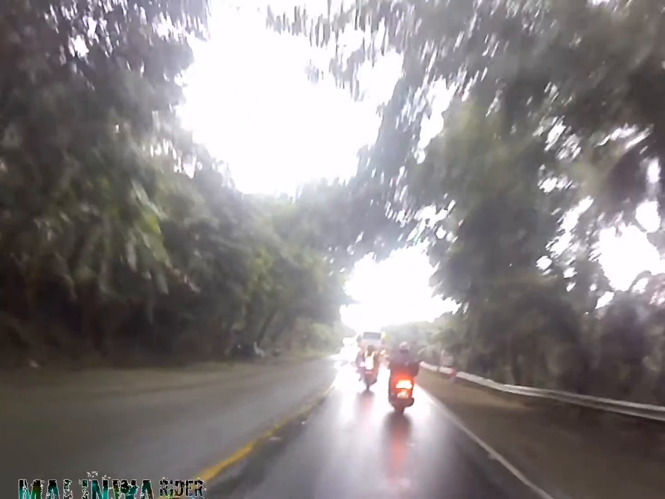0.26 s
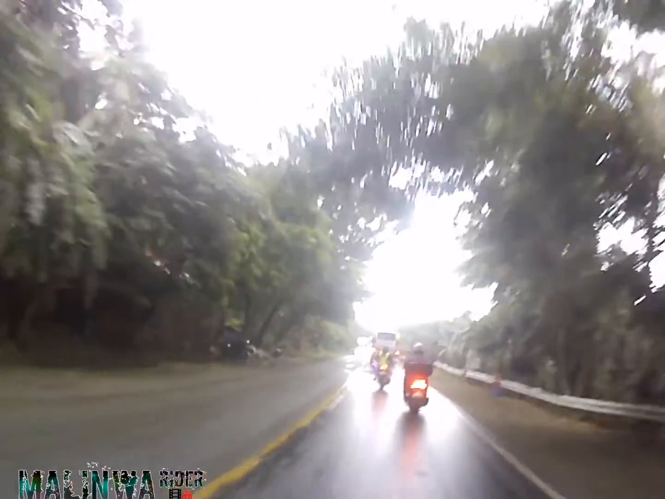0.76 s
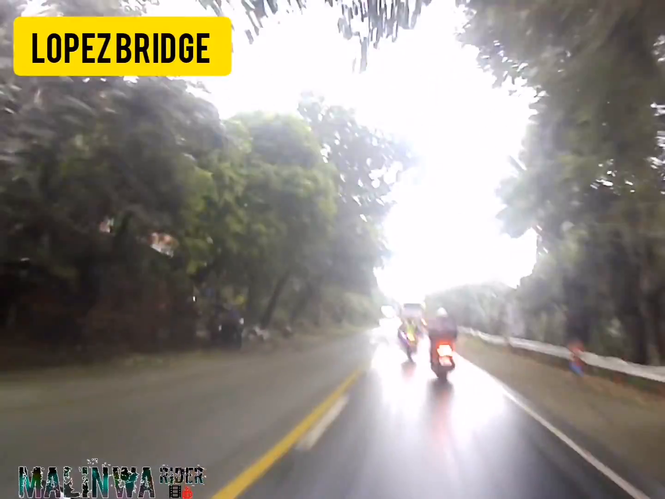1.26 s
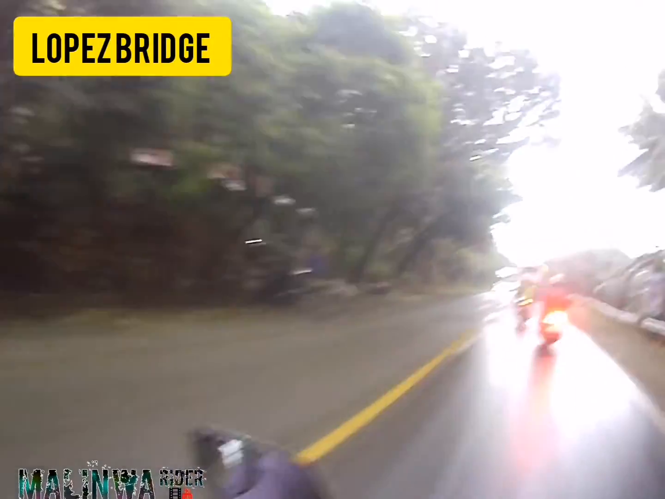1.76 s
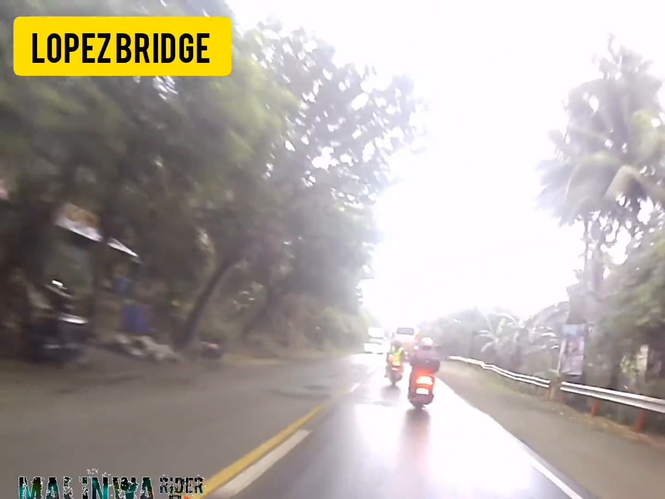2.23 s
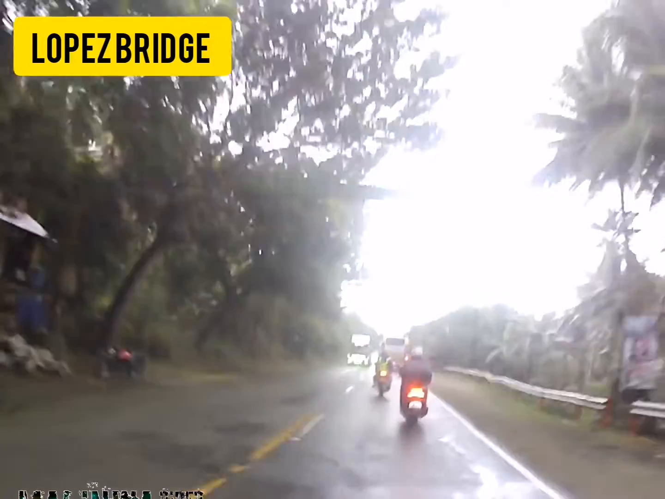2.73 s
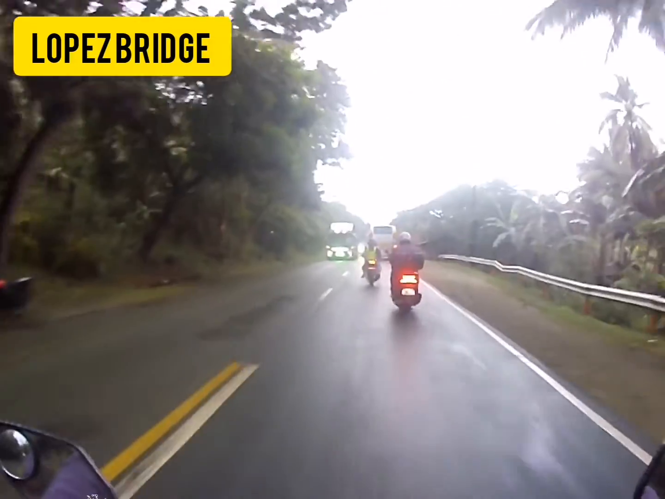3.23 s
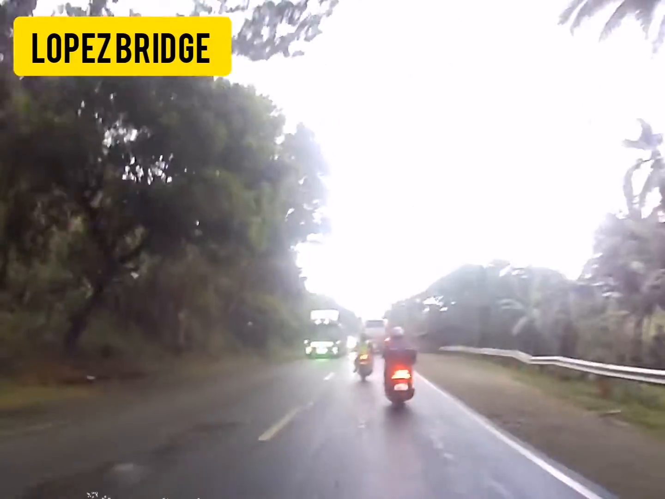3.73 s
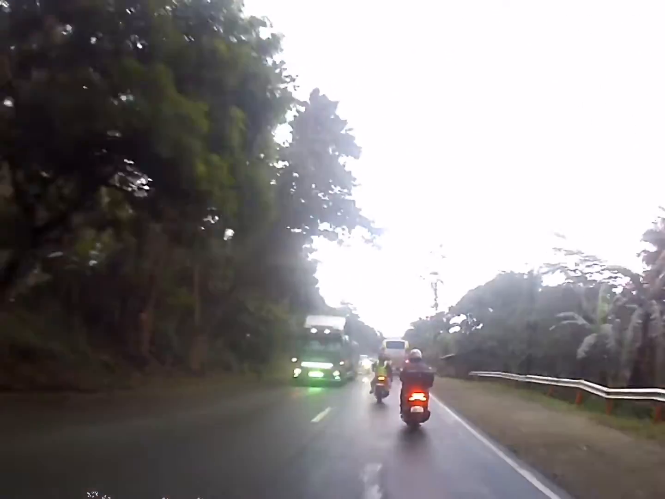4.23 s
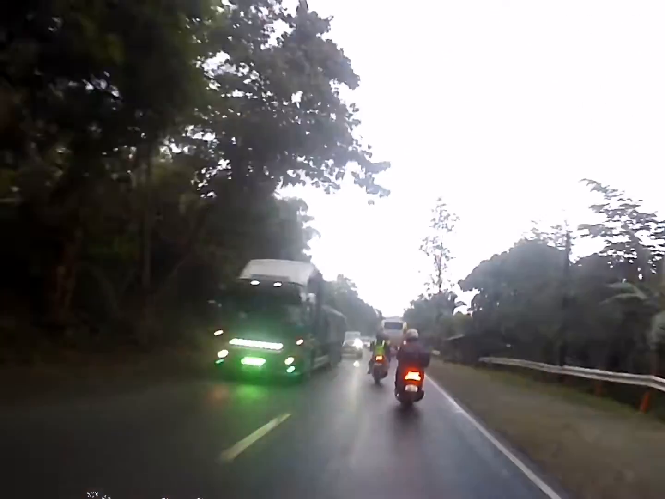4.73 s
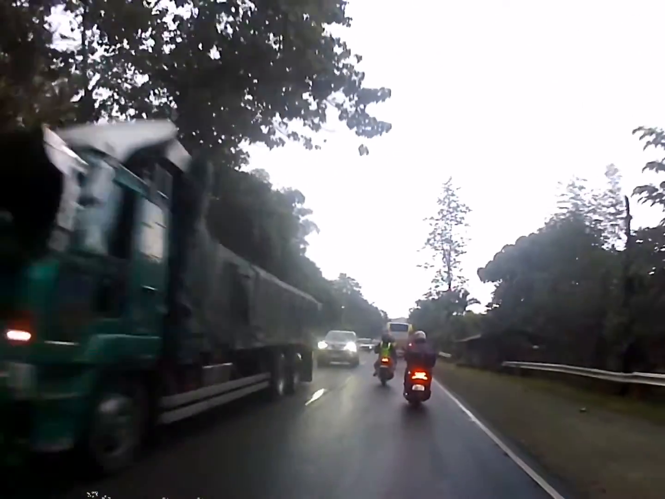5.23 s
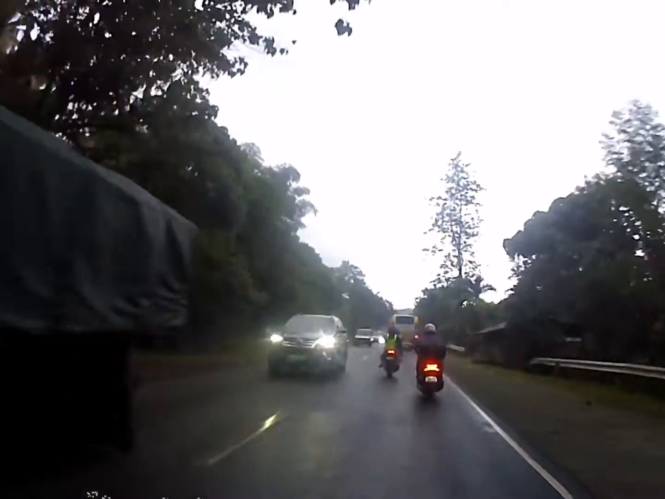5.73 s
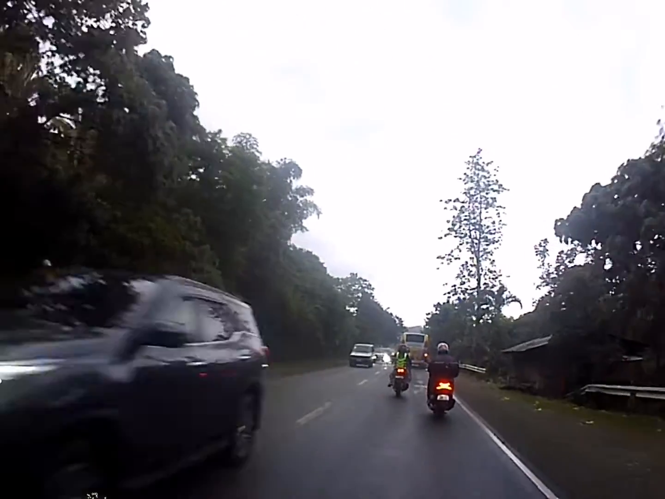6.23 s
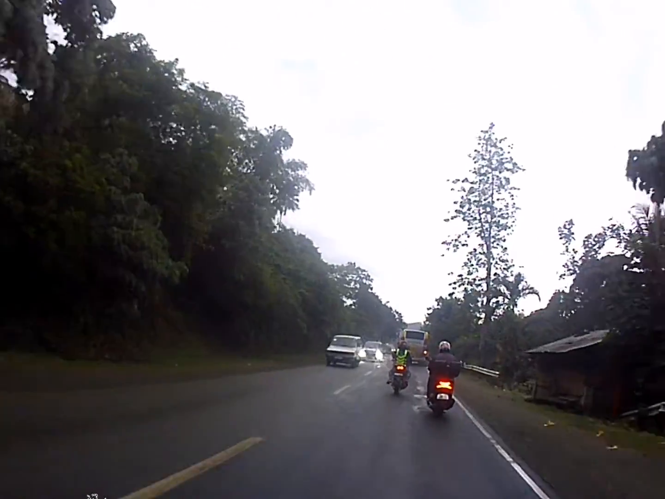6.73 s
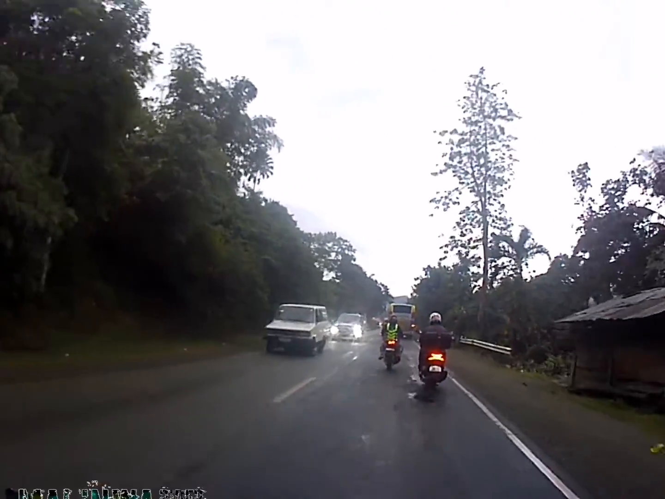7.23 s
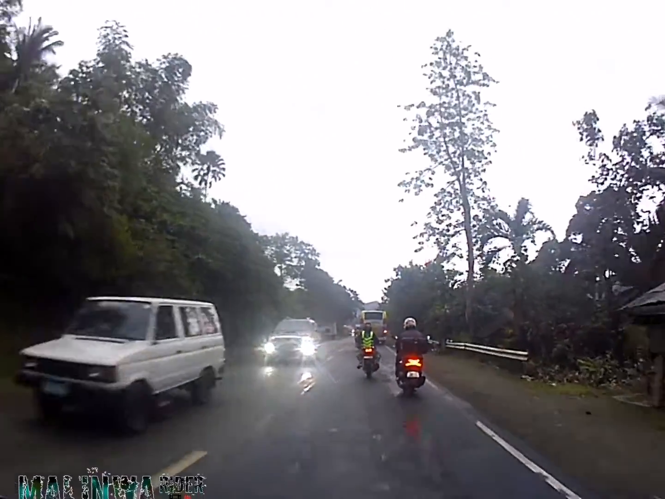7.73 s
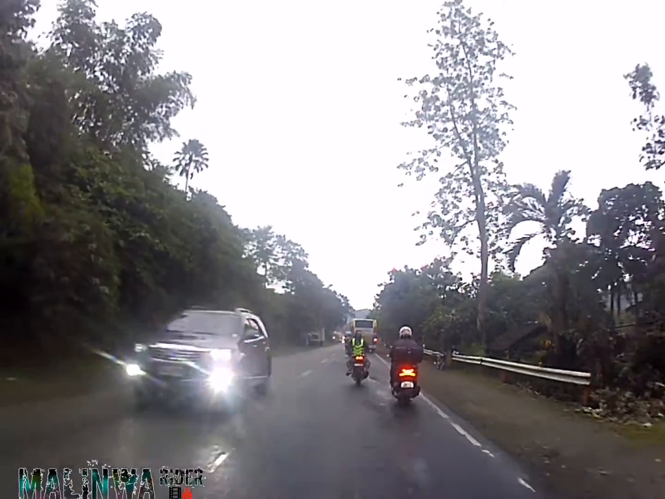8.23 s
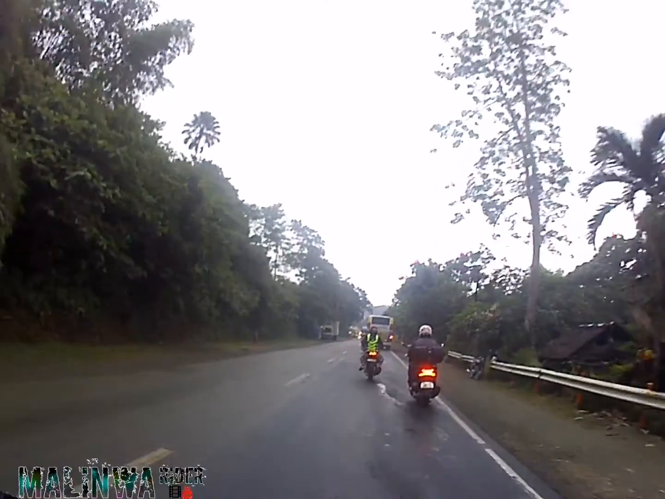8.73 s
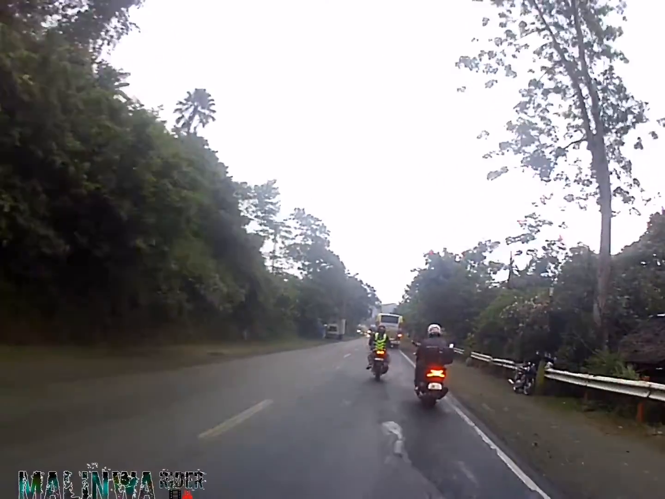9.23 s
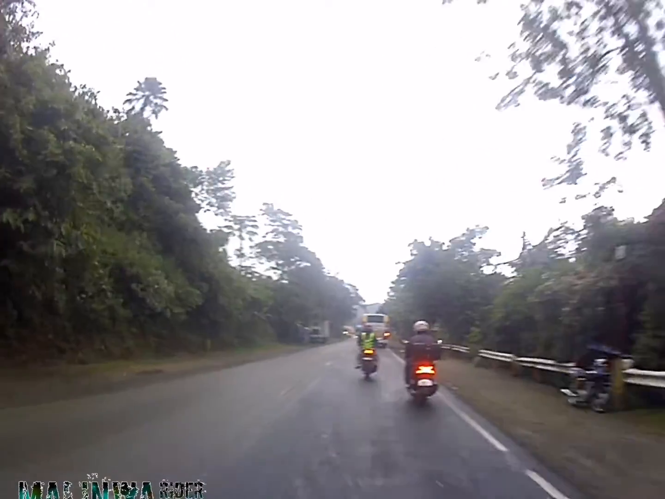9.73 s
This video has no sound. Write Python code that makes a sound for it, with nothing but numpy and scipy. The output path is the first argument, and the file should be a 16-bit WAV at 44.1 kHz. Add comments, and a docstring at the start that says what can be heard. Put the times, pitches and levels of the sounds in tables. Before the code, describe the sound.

A single-cylinder motorcycle cruises along a wet road for about ten seconds, heard from a cased microphone on the rider. The engine holds a low, slightly wavering thrum and drone, a little raspier in the first three seconds. Wind rumbles and rushes throughout, with irregular deep thumps and brief faint whistles between one and four seconds. Underneath, the tyres hiss softly and sizzle lightly through puddles. Fine spray builds from about four seconds, and an oncoming lorry passes between five and six with tyre roar, wake rumble and a wet swish, dropping slightly in pitch. A quieter car follows at 6.5 seconds, then a strong gust thuds near seven. Two more cars pass at about 8.1 and 8.7 seconds, the first with a brief falling whine, their slipstream rumbling over the microphone. Engine and wind continue to the end.

```python
"""A single-cylinder motorcycle cruises on a wet road, heard from a cased camera on the rider.
The exhaust thrums at multiples of the firing rate. Wind buffets the case and rushes through its
resonances. The tyres hiss as they peel water off the road and sizzle in puddles.
A lorry and three cars pass the other way with tyre roar, wake rumble and spray."""
import sys
import numpy as np
from scipy.fft import rfft, irfft, next_fast_len
from scipy.io import wavfile
from scipy.ndimage import map_coordinates

SR = 44100
rng = np.random.default_rng(int(sys.argv[2]) if len(sys.argv) > 2 else 0)


def bounce(signal):
    """Save signal as a 16-bit WAV file at the path given by the first command-line argument."""
    frames = np.transpose(np.atleast_2d(signal))
    limited = np.clip(frames, -1, 1)
    pcm = np.round(limited * 32767).astype(np.int16)
    wavfile.write(sys.argv[1], SR, pcm)


N = 439677
TIME_S = np.arange(N) / SR

# engine speed: time_s, firing_hz
FIRING_RATE = [(0, 28.3), (.7, 28.25), (1.5, 27.75), (3.2, 29.1), (3.9, 28.7), (5.7, 28.25), (6.6, 29.2),
               (8, 28.9), (8.8, 29.1), (10, 28.7)]
# throttle, as the booming order's level: time_s, relative_db
THROTTLE_LEVEL = [(0, -40.5), (.6, -42), (2, -39), (2.6, -38.5), (3.2, -39), (3.9, -43.5), (4.7, -39),
                  (6, -43), (7.6, -45), (9.97, -39)]
# weaker exhaust orders: firing_multiple, level_db
THRUM_ORDERS = [(2, -51), (3, -41), (4, -41), (5, -40.5), (6, -47.5), (7, -49), (10, -54), (11, -56),
                (12, -55.5), (15, -60)]
# exhaust rasp, pulling at low speed: firing_multiple, level_db
RASP_ORDERS = [(12, -55), (13, -52), (14, -53.5), (15, -54.5), (16, -50)]
# running gear drone: time_s, pitch_hz, level_db
GEAR_DRONE = [(0, 172.4, -42), (1, 173, -45.5), (2.6, 173.2, -40), (3.8, 177.2, -35), (4.7, 181.1, -42),
              (6.5, 183.3, -47), (9.97, 181.2, -41.5)]

# turbulence: time_s, relative_db
BUFFET_LEVEL = [(0, -30), (.85, -32), (1.5, -29), (2.1, -32.5), (3.6, -33.5), (4.2, -33), (4.9, -32.5),
                (5.5, -32), (6.2, -34), (6.6, -31), (7.1, -28), (7.55, -35), (8.2, -27), (8.7, -31.5),
                (9.4, -32.5), (9.97, -28.5)]
# turbulent rumble: freq_hz, density_db
BUFFET_SPECTRUM = [(12, -0.5), (25, -1.5), (55, -5), (100, -9.5), (160, -22), (250, -24.5), (500, -46.5),
                   (1200, -95)]
# gusts, deep thuds to higher flaps: time_s, level_db, centre_hz
GUST_EVENTS = [(.6, -23, 48), (1.3, -29.5, 90), (1.371, -27.5, 65), (1.437, -24.5, 68), (1.527, -22.5, 72),
               (1.622, -20.5, 42), (1.755, -25, 99), (1.812, -21, 50), (2.078, -28, 70), (2.785, -24.5, 90),
               (2.825, -23, 102), (4.28, -25.5, 62), (4.454, -24, 55.6), (4.572, -23, 61.5),
               (4.903, -22, 45.3), (5.162, -25.5, 61.6), (5.245, -27, 54.6), (5.702, -30, 55),
               (5.779, -29, 60), (5.991, -19.5, 40.4), (6.14, -21.5, 46), (6.327, -18, 38.6),
               (6.893, -15, 67), (7.088, -24.5, 52.3), (7.9, -23, 51.7), (8.134, -33, 72),
               (8.288, -25, 48.2), (8.365, -29, 52), (8.98, -16, 35.2), (9.127, -22.5, 40),
               (9.708, -26.5, 62), (9.887, -28, 54)]
# one gust: centre_multiple, density_db
GUST_SPECTRUM = [(.3, -4), (.7, 2), (1, 0), (1.5, -4), (2.5, -18), (4, -29.5), (20, -120)]
# air stream on the case: time_s, relative_db
AIRFLOW_LEVEL = [(0, -41.5), (.95, -42.5), (1.15, -39.5), (2.55, -41), (2.68, -41.5), (2.82, -39),
                 (3.1, -40.5), (3.6, -40), (3.8, -39.5), (4.4, -41), (6.4, -39.5), (6.8, -42), (8.5, -38),
                 (9.4, -41.5), (9.97, -40)]
# broad air rush: freq_hz, density_db
RUSH_SPECTRUM = [(50, -18), (120, 6), (200, 4.5), (270, -1), (350, 1), (490, -5.5), (640, -8), (900, -8),
                 (1130, -2.5), (1350, -3), (1650, -10), (2000, -15.5), (2450, -30.5), (3500, -39),
                 (6000, -78)]
# case resonances: centre_hz, width_hz, gain_re_rush_db
CASE_MODES = [(438, 130, -26), (1086, 50, -7), (1194, 97, -5.5), (1340, 48, -8.5), (1563, 55, -12)]
# wind whistles: time_s, pitch_hz, level_db, half_length_s, width_hz
WHISTLE_EVENTS = [(1.003, 1340, -48, 0.055, 18), (1.87, 1335, -43, 0.076, 18.6),
                  (1.19, 1300, -46, 0.15, 61), (1.75, 1156, -42.5, 0.5, 67), (2.2, 1340, -41.5, 0.23, 106),
                  (2.38, 1080, -42, 0.075, 46), (2.536, 1330, -40.5, 0.1, 13), (3, 1330, -46, .05, 60),
                  (3.81, 1240, -40.5, 0.1, 100), (3.772, 3230, -59, .05, 500), (9.227, 1142, -41, .05, 45)]

# oncoming wheels, three lorry axle groups then three cars:
# abreast_s, roar_db, wake_db, spray_db, swish_db, approach_s, retreat_s
PASSES = [(5.49, -35.5, -36.5, -61, -53, .2, 0.21), (5.73, -34, -33.5, -55.5, -50, 0.23, .18),
          (5.95, -34, -38.5, -66, -49.5, 0.25, .14), (6.48, -39.5, -49, -71, -59.5, 0.4, 0.18),
          (8.14, -34, -39.5, -71, -55, 0.29, 0.2), (8.72, -38.5, -34.5, -68, -55.5, 0.25, 0.18)]
# oncoming tyre roar: freq_hz, density_db
ROAR_SPECTRUM = [(300, -26), (600, -10), (900, -10), (1080, -2), (1300, 4.5), (1600, -5), (2000, -14),
                 (2500, -25.5), (3200, -30), (4400, -34), (5500, -45), (9000, -56.5), (14000, -85)]
# vehicle wake: freq_hz, density_db
WAKE_SPECTRUM = [(50, -14), (100, -5), (170, -8), (250, 6.5), (320, 7.5), (400, -0.5), (520, 1),
                 (620, -5.5), (1050, -5), (2000, -45), (6000, -92)]
# thrown spray: freq_hz, density_db
SPRAY_SPECTRUM = [(1500, -21), (3000, -18), (4500, -0.5), (5300, -8), (6300, -2), (7100, 4.5), (8200, -19),
                  (10400, -11), (11500, -19), (13300, -19), (14500, -17), (15700, -26)]
# close tyre swish: freq_hz, density_db
SWISH_SPECTRUM = [(1200, -20), (1900, 0), (2300, 4), (2650, 0), (3150, 5.5), (3700, -6), (4400, -5.5),
                  (5300, -22), (9000, -45)]
# squeaks and a passing car's whines: time_s, pitch_hz, level_db, half_length_s, glide_hz_per_s
SQUEAK_EVENTS = [(7.07, 5650, -66, 0.011, -2000), (7.12, 5680, -67, .01, -2000),
                 (7.228, 6380, -59, .014, -4000), (7.287, 6280, -62, .009, -2000),
                 (7.315, 6200, -70, .025, -1200), (8.085, 2000, -41, 0.035, -1000),
                 (8.23, 2000, -46, .08, -400), (8.037, 3010, -54, .03, -700),
                 (8.015, 1555, -39, 0.027, -600)]

# the bike's tyre hiss: freq_hz, density_db
HISS_SPECTRUM = [(1500, -5.5), (2500, 0), (3150, 1.5), (3650, -5), (4000, -3.5), (4400, -6.5), (5100, -13),
                 (6400, -9.5), (7200, -12.5), (8300, -19), (9600, -16), (10500, -12.5), (11300, -20),
                 (12500, -23), (15600, -25)]
# wetter and drier road: time_s, half_length_s, hiss_change_db
ROAD_PATCHES = [(2.8, .15, 0.5), (3.505, 0.12, -0.5), (7.3, 0.71, -1)]
# the lorry's mist: time_s, level_db
MIST_LEVEL = [(0, -90), (2.8, -71), (4.48, -61), (4.62, -58.5), (5.2, -55), (5.66, -52.5), (6.05, -70),
              (6.6, -100)]
# mist droplets: freq_hz, density_db
MIST_SPECTRUM = [(2000, -3), (2600, -5), (3300, 4), (3750, -1), (4500, -3), (5200, -11.5), (6200, -2.5),
                 (6900, -7.5), (8200, -15.5), (9600, -10.5), (10500, -6), (11500, -16), (13000, -27),
                 (15600, -27)]
# standing water: start_s, end_s, level_db
PUDDLE_SPANS = [(2.497, 3.05, -71), (3.68, 5.349, -68.5), (7.657, 8.6, -70)]
# tyres in standing water: freq_hz, density_db
SIZZLE_SPECTRUM = [(3000, -23), (4100, 4), (5150, -25), (5650, -3), (6650, -1), (7000, -9), (8200, -20),
                   (10400, -6), (11500, -26), (15000, -40)]
# drops on the case: time_s, level_db
DROP_HITS = [(6.521, -50), (8.675, -54)]

SPLASH_SCATTER_DB = 0.7


def exhaust(firing_phase, boom_order=8, firing_scatter_db=1.55, thrum_follow=0.77):
    """Uneven firings drive one booming order; weaker orders waver and partly follow the throttle."""
    throttle_db, = curves(THROTTLE_LEVEL)
    boom = amp(throttle_db + 1.5 + 1.95 * wobble(6))
    boom *= np.sin(boom_order * firing_phase + 0.38 * wobble(12))
    thrum, rasp = np.zeros((2, N))
    for order, db in THRUM_ORDERS:
        gain = amp(db + 2.8 * wobble(4))
        thrum += gain * np.sin(order * firing_phase + rng.uniform(0, 2 * np.pi) + 0.71 * wobble(14))
    thrum *= amp(thrum_follow * (throttle_db - throttle_db.mean()))
    for order, db in RASP_ORDERS:
        rasp += amp(db + 2.4 * wobble(3.2)) * np.sin(order * firing_phase + 0.5 * wobble(12))
    rasp *= bell(1.5, half_length_s=1.9)
    firing_gain = amp(firing_scatter_db * wobble(FIRING_RATE[0][1]))
    return firing_gain * (boom + thrum + rasp)


def running_gear():
    """The running gear drones on one wavering tone."""
    pitch_hz, level_db = curves(GEAR_DRONE)
    return amp(level_db + 2.1 * wobble(5.7)) * np.sin(phase_of(pitch_hz) + 0.48 * wobble(9))


def buffeting(eddy_lag_s=0.35, eddy_rise_db=1):
    """Eddies thump on the case, harder just after each vehicle; gusts add short bursts."""
    eddies = sum(bell(abreast_s + eddy_lag_s, half_length_s=0.16) for abreast_s, *_ in PASSES)
    level_db = curves(BUFFET_LEVEL)[0] + eddy_rise_db * eddies
    out = amp(level_db + 2.13 + 1.34 * wobble(18)) * noise(BUFFET_SPECTRUM)
    for time_s, db, centre_hz in GUST_EVENTS:
        window = bell(time_s, half_length_s=0.022)
        lumps = noise([(centre_hz * k, density_db) for k, density_db in GUST_SPECTRUM])
        out += amp(db) * unit(window * lumps) * np.sqrt(np.mean(window ** 2))
    return out


def airflow(firing_phase):
    """Turbulent air rings the hollow case; each firing shakes it a little."""
    def case_response(f):
        return 1 + sum(amp(db) * 1j * f * width_hz / (hz * hz - f * f + 1j * f * width_hz)
                       for hz, width_hz, db in CASE_MODES)

    level_db, = curves(AIRFLOW_LEVEL)
    flutter_db = 0.54 * wobble(18) + 0.43 * np.cos(firing_phase)
    rush = unit(filtered(noise(RUSH_SPECTRUM), case_response))
    return amp(level_db + 6.0 + flutter_db) * rush


def whistles():
    """The air stream briefly catches narrow resonances."""
    return sum(amp(db) * bell(time_s, half_length_s) * narrow_noise(hz, width_hz)
               for time_s, hz, db, half_length_s, width_hz in WHISTLE_EVENTS)


def traffic(doppler_ahead=1.04, doppler_behind=0.976, roar_lead_s=0.054):
    """Oncoming wheels swell and recede, their roar sinking in pitch; spray and swish carry less far."""
    out = np.zeros(N)
    for abreast_s, roar_db, wake_db, spray_db, swish_db, approach_s, retreat_s in PASSES:
        position = road_position(abreast_s, approach_s, retreat_s)
        distance = np.hypot(1, position)
        behind = 0.5 + 0.5 * position / distance
        tyres = sum(np.sqrt(share) * noise([(hz * ratio, db) for hz, db in ROAR_SPECTRUM])
                    for share, ratio in [(1 - behind, doppler_ahead), (behind, doppler_behind)])
        # tyres beam forward, so the roar peaks early
        roar_distance = np.hypot(1, road_position(abreast_s - roar_lead_s, approach_s, retreat_s))
        roar = amp(roar_db) * tyres / roar_distance ** 1.97
        wake = amp(wake_db) * noise(WAKE_SPECTRUM) / distance ** 2.02
        spray = amp(spray_db + SPLASH_SCATTER_DB * wobble(55))
        spray *= spatter(SPRAY_SPECTRUM, drops_per_s=900, drop_db=-2)
        spray /= distance ** np.where(TIME_S < abreast_s, 1.8, 3.5)
        swish = amp(swish_db) * noise(SWISH_SPECTRUM) / distance ** 2.5
        out += (roar + wake + spray + swish) * amp(0.78 * wobble(22))
    return out


def slipstream(time_s=8.41, level_db=-34):
    """The second car's slipstream rumbles over the case."""
    return amp(level_db) * bell(time_s, half_length_s=0.082) * noise(WAKE_SPECTRUM)


def squeaks():
    """Brief rough tones sink in pitch."""
    out = np.zeros(N)
    for time_s, hz, db, half_length_s, glide_hz_per_s in SQUEAK_EVENTS:
        phase = phase_of(hz + glide_hz_per_s * (TIME_S - time_s))
        roughness_rad = 0.57 * wobble(hz / 15)
        out += amp(db) * bell(time_s, half_length_s) * np.sin(phase + roughness_rad)
    return out


def wet_tyres(firing_phase, start_db=-58.5, drying_db_per_s=0.14, tread_hz=3140, tread_re_hiss_db=-10.5):
    """The bike's tyres peel water off a slowly drying road; the tread rings thinly."""
    patch_db = sum(db * bell(time_s, half_length_s) for time_s, half_length_s, db in ROAD_PATCHES)
    level_db = start_db - drying_db_per_s * TIME_S + patch_db
    shiver_db = 0.5 * wobble(6.3) + 0.51 * wobble(14) + 0.55 * np.cos(firing_phase)
    tread = amp(tread_re_hiss_db) * narrow_noise(tread_hz + 59.9 * wobble(3), width_hz=260)
    hiss = spatter(HISS_SPECTRUM, drops_per_s=630, drop_db=-23)
    return amp(level_db + shiver_db) * (hiss + tread)


def mist():
    """Fine spray hisses unevenly from far ahead of the lorry and dies soon after it passes."""
    level_db, = curves(MIST_LEVEL)
    splash_db = 0.7 * wobble(26) + SPLASH_SCATTER_DB * wobble(55)
    return amp(level_db + splash_db) * spatter(MIST_SPECTRUM, drops_per_s=660, drop_db=-4)


def puddles(edge_s=0.05):
    """The tyres sizzle while in standing water."""
    step = lambda time_s: 0.5 + 0.5 * np.tanh((TIME_S - time_s) / edge_s)
    gain = sum(amp(db) * step(start_s) * (1 - step(end_s)) for start_s, end_s, db in PUDDLE_SPANS)
    return gain * amp(1.2 * wobble(14)) * spatter(SIZZLE_SPECTRUM, drops_per_s=900, drop_db=-4)


def drop_ticks(decay_s=0.00036):
    """Drops hit the case, each a millisecond of bright crackle."""
    envelope = sum(amp(db) * np.exp(-np.abs(TIME_S - time_s) / decay_s) for time_s, db in DROP_HITS)
    return envelope * noise([(1500, -10), (3200, 4), (6000, -10), (14000, -9)])


def road_position(abreast_s, approach_s, retreat_s):
    """Position along the road in units of the closest gap; negative ahead."""
    return (TIME_S - abreast_s) / np.where(TIME_S < abreast_s, approach_s, retreat_s)


def amp(db):
    """Decibels to gain."""
    return 10 ** (np.asarray(db) / 20)


def unit(x):
    """x at rms 1."""
    return x / np.sqrt(np.mean(x ** 2) + 1e-20)


def curves(rows):
    """Per-sample values of each column after time_s."""
    time_s, *columns = np.transpose(rows)
    return [np.interp(TIME_S, time_s, column) for column in columns]


def bell(centre_s, half_length_s):
    """Gaussian swell, peak 1."""
    return np.exp(-((TIME_S - centre_s) / half_length_s) ** 2)


def wobble(knots_per_s, knots=4096):
    """Smooth random curve."""
    return map_coordinates(rng.standard_normal(knots), [TIME_S * knots_per_s + 2], mode="wrap")


def phase_of(hz):
    """Running phase, rad."""
    return 2 * np.pi * np.cumsum(hz) / SR


def filtered(x, response):
    """x through a frequency response."""
    size = next_fast_len(N + SR // 2)
    return irfft(rfft(x, size) * response(np.fft.rfftfreq(size, 1 / SR)), size)[:N]


def coloured(x, spectrum):
    """x shaped by (freq_hz, density_db) points on a log axis, rms 1."""
    freq_hz, db = np.transpose(spectrum)
    return unit(filtered(x, lambda hz: amp(np.interp(np.log(hz + 1), np.log(freq_hz), db))))


def noise(spectrum):
    """Coloured noise, rms 1."""
    return coloured(rng.standard_normal(N), spectrum)


def narrow_noise(centre_hz, width_hz):
    """Fuzzy tone, rms 1."""
    phase = phase_of(centre_hz * np.ones(N))
    return unit(wobble(width_hz, 8192) * np.cos(phase) + wobble(width_hz, 8192) * np.sin(phase))


def spatter(spectrum, drops_per_s, drop_db):
    """Water hiss grained with droplet ticks, rms 1."""
    drops = (rng.random(N) < drops_per_s / SR) * rng.uniform(-1.5, 1, N)
    return coloured(rng.standard_normal(N) + amp(drop_db) * unit(drops), spectrum)


def scene():
    """Mono sum at the camera."""
    firing_phase = phase_of(curves(FIRING_RATE)[0])
    wind = buffeting() + airflow(firing_phase) + whistles()
    water = wet_tyres(firing_phase) + puddles() + mist() + drop_ticks()
    bike = exhaust(firing_phase) + running_gear()
    return (bike + wind + water + traffic() + slipstream() + squeaks())[None]


def record(dry):
    """Short fades at both ends; the camera's treble rolls off up to its band limit."""
    fade_s, rolloff_hz, limit_hz = 0.004, 14900, 15650
    faded = dry[0] * np.clip(np.minimum(TIME_S, TIME_S[::-1]) / fade_s, 0, 1)
    return filtered(faded, lambda hz: (hz < limit_hz) / np.sqrt(1 + (hz / rolloff_hz) ** 40))[None]


dry = scene()
out = record(dry)
bounce(out)
```